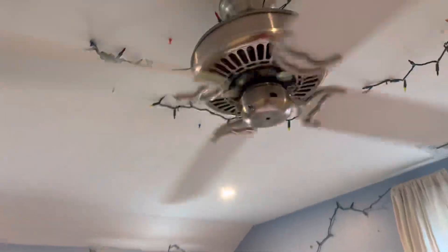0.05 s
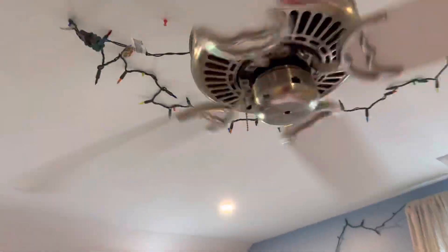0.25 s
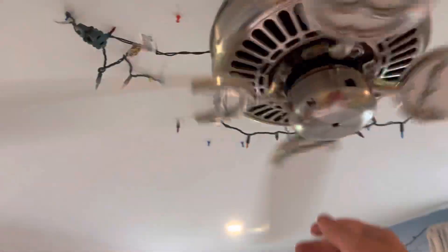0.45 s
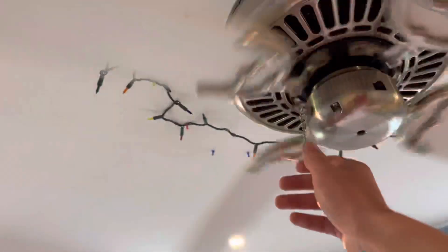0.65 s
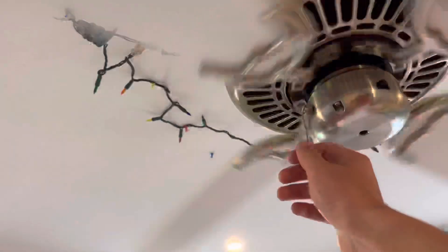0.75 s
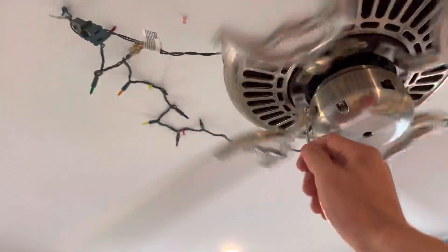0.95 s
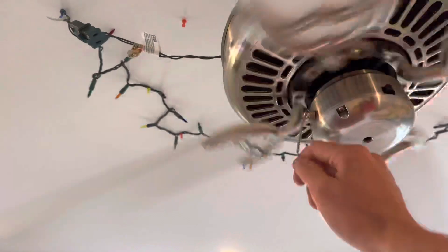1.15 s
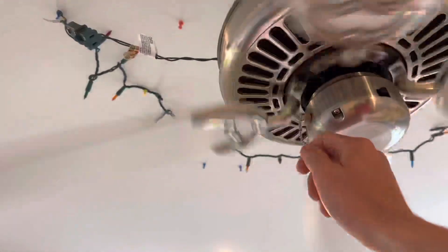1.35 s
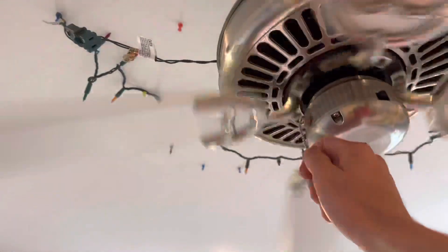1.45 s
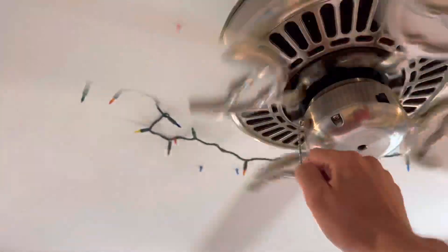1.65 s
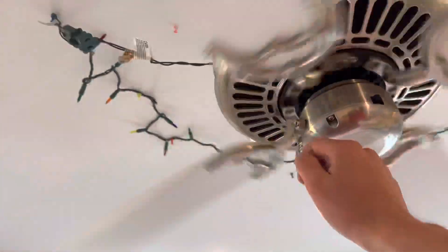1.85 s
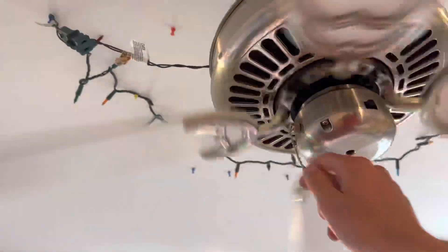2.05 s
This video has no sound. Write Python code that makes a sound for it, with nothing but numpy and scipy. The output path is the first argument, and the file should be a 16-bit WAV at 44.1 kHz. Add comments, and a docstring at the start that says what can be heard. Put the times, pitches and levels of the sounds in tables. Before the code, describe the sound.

A ceiling fan's pull chain ticks and snaps twice over a low hum of air.

```python
"""Dull knocks of someone stepping up, a soft arm rustle and a ceiling fan's downdraught buffeting the mic.
Then a hand pulls the running fan's chain switch twice, close to a phone in a small room.
On each pull and release, chain beads tick over the rim, then the switch snaps and rings the metal housing.
Air from the blades hums low throughout."""
import sys
import numpy as np
from scipy import signal
from scipy.fft import rfft, irfft
from scipy.io import wavfile
from scipy.ndimage import uniform_filter1d

SR = 44100
rng = np.random.default_rng(int(sys.argv[2]) if len(sys.argv) > 2 else 0)


def persist_wave(psi):
    """Save psi, clipped to +-1, as 16-bit WAV."""
    counts = np.round(np.clip(psi, -1, 1) * 32767).astype(np.int16)
    wavfile.write(sys.argv[1], SR, np.atleast_2d(counts).T)


N = 92610

# beads on the rim: start_s, level_db, ring_hz, ring_db, second_hz, body_db, treble_db, pan_db (left - right)
BEAD_TICKS = [(.9185, -67, 3300, -1, 9750, -5, 9, 0), (.9415, -42.5, 4970, -4, 3270, 0, -4.5, 1),
              (.9805, -47, 9750, -20, 6760, -5, -2, -20.5), (.9852, -31, 1990, -20, 2950, 0.5, -10.5, 3),
              (1.0045, -38.5, 6850, 7.5, 9620, -3, -15.5, 5), (1.1648, -42, 9700, -11, 3330, -11, 6, 0),
              (1.1858, -36.5, 2470, -2.5, 3330, -1.5, 5, -1), (1.484, -74, 9700, 0, 6750, -3, 9, -3),
              (1.500, -58.5, 9900, -1.5, 6750, -4, 0, 0), (1.548, -45, 4700, -5, 9800, -2, -4, .5),
              (1.5958, -37.5, 2500, -4.5, 2970, 1, -5, 2.5),
              (1.6203, -36.5, 6940, -12, 2630, 6.5, -10, 6.5), (1.7888, -39, 9750, 0.5, 3220, -1, -3, -1),
              (1.8146, -33.5, 3020, -15, 2450, -7, -4.5, 2.5), (1.8335, -37, 6800, -10, 9880, -8, 6, 1),
              (1.9944, -59.5, 9740, -3, 6750, 1, 0.5, -2), (2.0552, -65.5, 4860, -0.5, 9750, -3, 9.5, -1)]
# switch snaps: start_s, level_db, ring_hz, ring_db, second_hz, body_db, treble_db, pan_db
SWITCH_SNAPS = [(1.0189, -30, 3110, -7.5, 9900, -4, 2.5, 2.5),
                (1.2029, -25.5, 4140, -11.5, 2900, 0.5, -3, 3.5),
                (1.6352, -28.5, 2660, -7, 2000, 1.5, 1, 1.5), (1.8351, -27.5, 3215, 1, 2970, -4.5, -3, 2.5)]
# switch resonances: pitch_hz, level_db, t60_s
SWITCH_MODES = [(690, -16, .06), (1990, -20, .05), (2615, -22, .05), (2790, -22, .05), (2955, -19, .05),
                (3338, -20, .05), (3617, -19, .04), (3990, -21, .04), (4435, -14, .045), (4850, -21, .04),
                (6745, -13, .025), (9750, -9, .03), (10500, -12, .025), (14200, -12, .02)]
# beating pair of housing resonances: pitch_hz, level_db, t60_s
HOUSING_MODES = [(1256, -19, .15), (1281, -20, .13)]
# metal-on-metal contact noise: freq_hz, density_db
CRACK_SPECTRUM = [(150, -36), (650, -0.5), (1050, -19.5), (1500, -15.5), (2000, -9.5), (3200, -4.5),
                  (5400, -9.5), (6800, -2), (7700, -10.5), (10000, -2), (12000, -11), (14500, -11),
                  (16000, -23)]
# chain taut: start_s, end_s
PULL_SPANS = [(.93, 1.1), (1.53, 1.7)]
# chain running in or out: start_s, end_s
SLIDE_SPANS = [(.945, 1.018), (1.17, 1.2), (1.552, 1.632), (1.795, 1.832)]
# stepping up: start_s, body_db, treble_db, tap_db, pan_db
STEP_KNOCKS = [(.066, -68, 5, -43, 9.5), (0.2228, -35.5, 4, -32.5, 4.5), (0.39, -43, -7, -39.5, 5),
               (.552, -41, -12, -33.5, 4), (.672, -50.5, -3, -41.5, 2.5), (0.805, -50, -17, -53, 4.5),
               (0.9, -51.5, -23, -50.5, 0)]
# knock body: freq_hz, density_db
KNOCK_SPECTRUM = [(120, -8), (400, 0), (650, 2), (930, 8), (1230, -4), (1700, -8), (2300, -17.5),
                  (3500, -16), (6000, -30.5), (14000, -44)]
# air puffs on the mic: peak_s, level_db, centre_hz, sigma_s, pan_db
AIR_PUFFS = [(.025, -50, 142, 0.013, -3), (0.132, -39, 60.5, 0.017, -0.5), (0.272, -26, 82, 0.0091, -1.5),
             (0.303, -21, 77, 0.0054, 1), (.349, -28.5, 147, 0.013, 5.5), (.461, -24, 155, 0.0063, 1.5),
             (0.584, -38, 202, 0.011, -1.5), (0.731, -37.5, 89.5, 0.014, 10.5), (.835, -41, 158, 0.019, 2),
             (0.934, -41.5, 380, 0.0051, 10), (1.027, -43, 296, 0.0027, 8.5), (1.137, -47, 179, 0.0056, 1),
             (1.208, -45.5, 192, 0.0029, 8), (1.239, -38.5, 263, 0.0025, 9.5),
             (1.276, -45.5, 191, 0.025, -0.5), (1.362, -42, 238, 0.0066, 0.5),
             (1.44, -42, 158, 0.016, -0.5), (1.543, -40.5, 220, 0.0083, 10), (1.566, -33, 324, 0.0024, 4),
             (1.661, -39.5, 252, 0.013, 5.5), (1.675, -41.5, 112, 0.0084, 6),
             (1.686, -34.5, 380, 0.0035, 10.5), (1.923, -41, 339, 0.0086, 6), (2.082, -45.5, 306, 0.01, 4)]
# downdraught on the mic: time_s, level_db
GUST_ENVELOPE = [(0, -35.5), (.08, -53), (0.118, -61), (0.212, -41), (0.278, -29.5), (0.452, -25.5),
                 (.53, -31.5), (.61, -33), (.75, -35.5), (.83, -42), (.93, -47.5), (1.1, -73), (2.1, -89)]
# downdraught rumble: freq_hz, density_db
GUST_SPECTRUM = [(18, -3), (32, -11.5), (55, 7), (85, 1.5), (130, -9.5), (190, -15), (280, -23.5),
                 (500, -37.5), (1200, -69)]
# blade air: freq_hz, density_db
BLADE_SPECTRUM = [(60, -4), (130, -1), (200, 3.5), (320, 0.5), (480, -11), (750, -19.5), (1500, -28.5),
                  (3000, -43), (9000, -51.5), (15000, -49)]
# blade air swell: time_s, gain_db
BLADE_SWELL = [(0, -3.5), (.13, -5.5), (.3, -1), (.9, -0.5), (1.3, -1.5), (1.48, -0.5), (1.62, 6.5),
               (1.76, 1), (2.1, -0.5)]
# arm rustle: time_s, level_db
RUSTLE_ENVELOPE = [(0, -55.5), (.14, -58), (.2, -59.5), (.33, -61), (.56, -57.5), (.68, -70), (.8, -92),
                   (1, -59), (2.1, -90.5)]
# arm rustle: freq_hz, density_db
RUSTLE_SPECTRUM = [(300, -1), (550, 3), (1100, 0), (1700, 2), (2500, -9), (5000, -11), (7700, -20),
                   (10000, -16), (15000, -59.5)]
# room decay: freq_hz, t60_s
ROOM_DECAY = [(200, .5), (1000, .19), (3200, .22), (7000, .23), (10000, .18), (15000, .12)]
# phone's sliding low-cut: time_s, corner_hz
LOW_CUT_TRACK = [(0, 22), (.78, 6.1), (.88, 53), (.98, 104), (1.08, 73), (1.22, 37), (1.45, 48), (1.68, 75),
                 (1.715, 177), (2.0, 138), (2.1, 98)]

BODY_HZ, TREBLE_HZ = 1400, 5850  # shelf corners


def pull_chain(tick_room_db=-3, snap_room_db=-1.5, ceiling_delay_s=0.017, ceiling_db=-14):
    """Bead ticks and switch snaps, mirrored by the ceiling and spread by the room."""
    ticks = metal_clicks(BEAD_TICKS, chatter_s=0.0026, decay_s=0.0016, modes_db=0) + bead_slide()
    snaps = metal_clicks(SWITCH_SNAPS, chatter_s=0.0042, decay_s=0.0014, modes_db=2) + chain_rattle()
    out = ticks + snaps + room(amp(tick_room_db) * ticks + amp(snap_room_db) * snaps)
    add(out, ceiling_delay_s, amp(ceiling_db) * (ticks + snaps), pan_db=0)
    return out


def metal_clicks(rows, chatter_s, decay_s, modes_db, crack_db=-1, rise_s=0.0012):
    """Metal parts chatter for a few ms, ringing the switch and the housing."""
    out, t = np.zeros((2, N)), np.arange(SR // 4) / SR
    rise = 1 - np.exp(-t / rise_s)
    fade_s = np.maximum(t - chatter_s, 0)
    for start_s, level_db, ring_hz, ring_db, second_hz, body_db, treble_db, pan_db in rows:
        crack = noise(lambda f: along(CRACK_SPECTRUM, f), len(t), 0.52) * np.exp(-fade_s / decay_s)
        ring = switch_ring(t, fade_s, ring_hz, second_hz, ring_db, modes_db)
        click = np.pad((amp(crack_db) * crack + ring) * rise, ((0, 0), (0, len(t))))
        click = shape(click, lambda f: body_db * (1 - shelf(f, BODY_HZ)) + treble_db * shelf(f, TREBLE_HZ))
        housing = housing_ring(t, start_s) * rise
        add(out, start_s, amp(level_db) * (click[:, :len(t)] + housing), pan_db)
    return out


def switch_ring(t, fade_s, ring_hz, second_hz, ring_db, modes_db, focus_db=-8.5, cluster_db=-2.5):
    """A brief noise cluster plus the switch modes, with extra drive near two pitches."""
    cluster = band_noise(ring_hz, width=0.12, size=len(t), coherence=0.52)
    ring = amp(ring_db + cluster_db) * cluster * np.exp(-fade_s / 0.0038)
    for hz, level_db, t60_s in SWITCH_MODES:
        focus = max(bell(hz, ring_hz, width=0.04), bell(hz, second_hz, width=0.04))
        gain = amp(level_db + modes_db) + focus * amp(ring_db + focus_db)
        ring += gain * mode(hz, t60_s, t)
    return ring


def housing_ring(t, start_s, slack_db=-10):
    """Two close housing modes beat; weaker when the chain is let go."""
    taut = any(begin_s < start_s < end_s for begin_s, end_s in PULL_SPANS)
    drive_db = 0 if taut else slack_db
    return sum(amp(level_db + drive_db) * mode(hz, t60_s, t) for hz, level_db, t60_s in HOUSING_MODES)


def mode(hz, t60_s, t, scatter_db=2, detune=0.0052):
    """One fading partial at the two mic ports, slightly different on every blow."""
    jitter = rng.standard_normal(4)
    phase_rad = 2 * np.pi * rng.random() + 0.15 * jitter[2:, None]
    envelope = amp(scatter_db * jitter[0]) * np.exp(-np.log(1000) * t / t60_s)
    return envelope * np.sin(2 * np.pi * hz * (1 + detune * jitter[1]) * t + phase_rad)


def chain_rattle(gain_db=-13.5, decay_s=0.01):
    """The chain shivers after each snap."""
    out, t = np.zeros((2, N)), np.arange(SR // 6) / SR
    for start_s, level_db, *_, treble_db, pan_db in SWITCH_SNAPS:
        beads = bead_collisions(len(t), rate_per_s=2100, treble_db=treble_db)
        add(out, start_s, amp(level_db + gain_db) * beads * np.exp(-t / decay_s), pan_db)
    return out


def bead_slide(level_db=-61.5):
    """Loose beads jostle faintly while the chain runs in or out."""
    t = np.arange(N) / SR
    moving = sum((t > start_s) & (t < end_s) for start_s, end_s in SLIDE_SPANS)
    return amp(level_db) * moving * bead_collisions(N, rate_per_s=560, treble_db=-10)


def bead_collisions(size, rate_per_s, treble_db):
    """Tiny metal impacts at random times, rms 1."""
    impacts = (rng.random(size) < rate_per_s / SR) * rng.standard_normal((2, size))
    return unit(shape(impacts, lambda f: along(CRACK_SPECTRUM, f) + treble_db * shelf(f, TREBLE_HZ)))


def step_knocks(body_decay_s=0.0055, tap_decay_s=0.0018, rise_s=0.0014, room_db=1):
    """Dull, damped knocks of stepping up, each with a sharp contact tap, and plenty of room."""
    out, t = np.zeros((2, N)), np.arange(SR // 8) / SR
    rise = 1 - np.exp(-t / rise_s)
    for start_s, body_db, treble_db, tap_db, pan_db in STEP_KNOCKS:
        body = noise(lambda f: along(KNOCK_SPECTRUM, f) + treble_db * shelf(f, 1500), len(t), 0.43)
        body *= amp(body_db) * np.exp(-t / body_decay_s)
        tap = band_noise(centre_hz=1593, width=0.19, size=len(t), coherence=0.86)
        tap *= amp(tap_db) * np.exp(-t / tap_decay_s)
        add(out, start_s, 2 * (body + tap) * rise, pan_db)
    return out + amp(room_db) * room(out)


def downdraught(flicker_db=1, octave_fall_db=12.5, port_hz=634):
    """Turbulence at the mic ports: a rumbling gust and short puffs, which the ports dull."""
    gust_db = timeline(GUST_ENVELOPE) + flicker_db * wander(rate_hz=18)
    out = noise(lambda f: along(GUST_SPECTRUM, f), N, 0.49) * amp(gust_db)
    t = np.arange(SR // 8) / SR
    t -= t.mean()
    for peak_s, level_db, centre_hz, sigma_s, pan_db in AIR_PUFFS:
        swell = np.exp(-(t / sigma_s) ** 2 / 2)
        eddy = noise(lambda f: -octave_fall_db * np.log2((f + 1) / centre_hz) ** 2 - 12 * shelf(f, port_hz),
                     len(t), 0.69)
        puff = unit(swell * eddy) * np.sqrt(np.mean(swell ** 2))
        add(out, peak_s + t[0], amp(level_db) * puff, pan_db)
    return out


def blade_air(base_db=-52.5, waver_db=1.47):
    """Low, wavering hum of air from the blades."""
    level_db = base_db + timeline(BLADE_SWELL) + waver_db * wander(rate_hz=22.27)
    return noise(lambda f: along(BLADE_SPECTRUM, f), N, 0.36) * amp(level_db)


def arm_rustle(flicker_db=1.5):
    """Soft, uneven rustle of the arm reaching up."""
    level_db = timeline(RUSTLE_ENVELOPE) + flicker_db * wander(rate_hz=44.55)
    return noise(lambda f: along(RUSTLE_SPECTRUM, f), N, 0.21) * amp(level_db)


def room(x, treble_db=-3.5, onset_s=0.0014):
    """Diffuse tail of the small room; the treble is weaker and dies first."""
    t = np.arange(SR // 2) / SR
    f = np.fft.rfftfreq(len(t), 1 / SR)
    edges_hz = np.r_[0, np.geomspace(300, SR / 2 + 1, 12)]
    phases = np.exp(2j * np.pi * rng.random((2, len(f))))
    spectrum = phases * np.sqrt(len(t)) * amp(treble_db * shelf(f, TREBLE_HZ))
    tail = 0
    for low_hz, high_hz in zip(edges_hz, edges_hz[1:]):
        fall_per_s = np.log(1000) / along(ROOM_DECAY, (low_hz + high_hz) / 2)
        band = irfft(spectrum * ((f >= low_hz) & (f < high_hz)), len(t))
        tail += band * np.exp(-fall_per_s * t) * np.sqrt(2 * fall_per_s / SR)
    return signal.fftconvolve(x, tail * np.clip(t / onset_s, 0, 1) ** 2, axes=1)[:, :N]


def amp(db):
    """Decibels to gain."""
    return 10 ** (np.asarray(db) / 20)


def unit(x):
    """Scale to rms 1."""
    return x / np.sqrt(np.mean(x ** 2))


def along(points, hz):
    """Read (freq_hz, value) rows on a log-frequency axis."""
    freqs_hz, values = np.array(points, float).T
    return np.interp(np.log(hz + 1), np.log(freqs_hz), values)


def timeline(points):
    """Read (time_s, value) rows at every sample."""
    return np.interp(np.arange(N) / SR, *np.array(points).T)


def shape(x, db_at):
    """Filter by a dB gain given as a function of frequency."""
    n = x.shape[-1]
    return irfft(rfft(x) * amp(db_at(np.fft.rfftfreq(n, 1 / SR))), n)


def shelf(hz, corner_hz):
    """Smooth step: 0 below the corner, 1 above."""
    return 1 - 1 / (1 + (hz / corner_hz) ** 4)


def bell(hz, centre_hz, width):
    """Bell curve of height 1; width relative to the centre."""
    return np.exp(-(np.log((hz + 1) / centre_hz) / width) ** 2 / 2)


def noise(db_at, size, coherence):
    """Coloured stereo noise, rms 1; coherence is the power share common to both ports."""
    white = rng.standard_normal((3, size))
    return unit(shape(np.sqrt(coherence) * white[2] + np.sqrt(1 - coherence) * white[:2], db_at))


def band_noise(centre_hz, width, size, coherence):
    """Stereo noise in a bell-shaped band, rms 1."""
    return noise(lambda f: 20 * np.log10(bell(f, centre_hz, width) + 1e-6), size, coherence)


def wander(rate_hz):
    """Smooth random drift, spread near 1."""
    hold = int(SR / rate_hz)
    steps = np.repeat(rng.standard_normal(N // hold + 1), hold)
    return 1.3 * uniform_filter1d(uniform_filter1d(steps, hold), hold)[:N]


def add(out, start_s, sound, pan_db):
    """Mix in a panned sound at its time."""
    i = max(int(start_s * SR), 0)
    part = (sound * amp(np.array([[pan_db], [-pan_db]]) / 2))[:, :max(N - i, 0)]
    out[:, i:i + part.shape[1]] += part


def scene():
    """All sources at the phone."""
    return pull_chain() + step_knocks() + downdraught() + blade_air() + arm_rustle()


def record(dry):
    """The phone thins the bass with a sliding low-cut and cuts the top."""
    f, t, frames = signal.stft(dry, SR, nperseg=2048, noverlap=1536)
    corner_hz = np.interp(t, *np.array(LOW_CUT_TRACK).T)
    frames *= shelf(f[:, None], corner_hz) ** 3
    thinned = signal.istft(frames, SR, nperseg=2048, noverlap=1536)[1][:, :N]
    top_hz = 16200
    return signal.sosfilt(signal.ellip(8, 0.2, 70, top_hz, fs=SR, output="sos"), thinned)


dry = scene()
out = record(dry)
persist_wave(out)
```